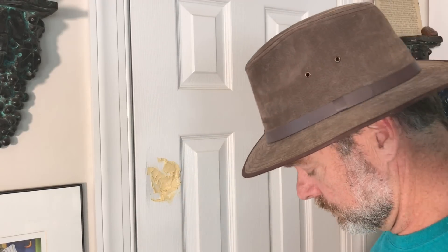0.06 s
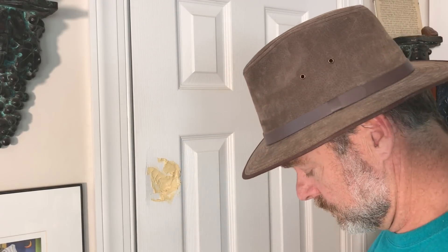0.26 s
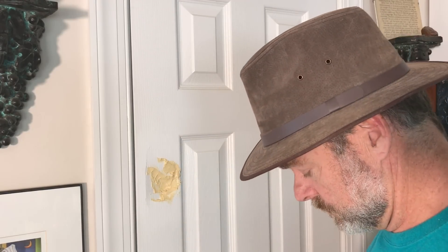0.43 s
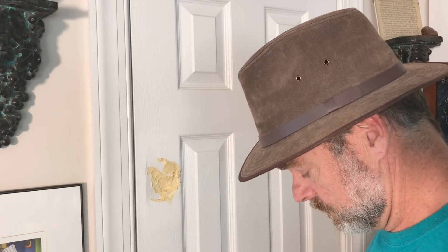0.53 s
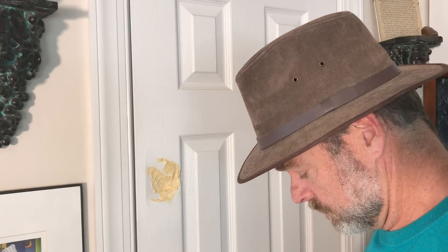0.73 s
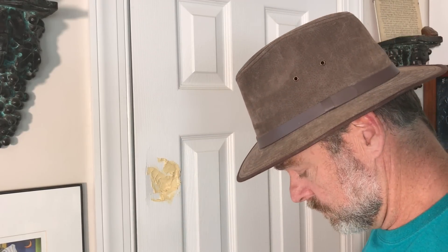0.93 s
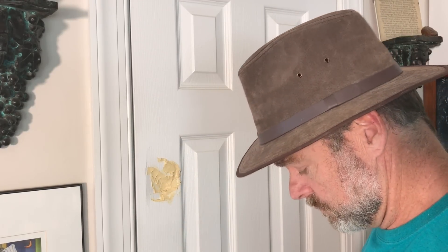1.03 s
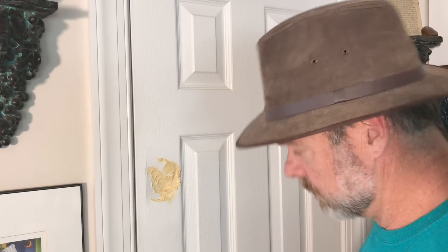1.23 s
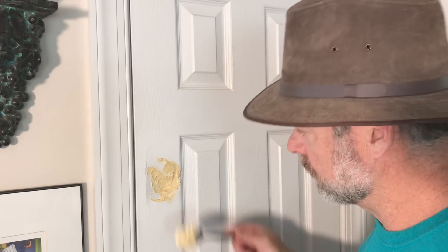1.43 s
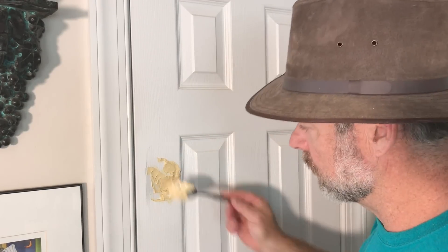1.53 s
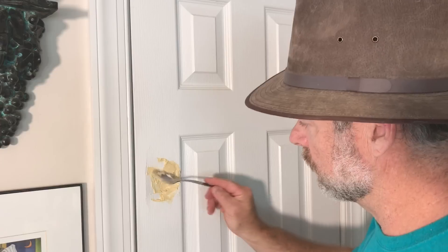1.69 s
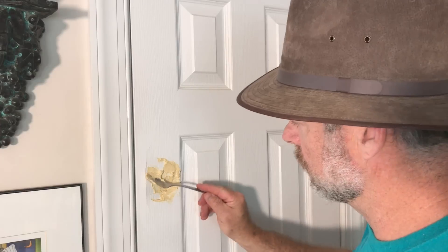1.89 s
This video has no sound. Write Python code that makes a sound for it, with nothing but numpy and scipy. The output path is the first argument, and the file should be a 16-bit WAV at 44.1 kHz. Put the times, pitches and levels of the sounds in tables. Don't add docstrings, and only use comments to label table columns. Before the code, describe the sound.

A metal spoon hits a small hand-held tin close to the microphone. Quiet motor hum and room rumble run throughout. After a barely audible brush at 0.22 seconds, a loud, bright clack lands at 0.25, with rapid bounces, a short thud and hallway reverberation. Light ticks follow from 0.38 to 0.6. A faint gritty scrape sings metallically around 0.75-1.0, then tiny touches near 1.27.

```python
import sys
import numpy as np
from scipy import signal
from scipy.fft import rfft, irfft, next_fast_len
from scipy.io import wavfile
from scipy.ndimage import map_coordinates

SR = 44100
rng = np.random.default_rng(int(sys.argv[2]) if len(sys.argv) > 2 else 0)


def linear_from_db(decibels):
    return 10 ** (np.asarray(decibels, float) / 20)


def persist_wave(psi):
    counts = np.round(np.clip(psi, -1, 1) * 32767).astype(np.int16)
    wavfile.write(sys.argv[1], SR, np.atleast_2d(counts).T)


N = 85995

# multiple of the motor rate, level/dB
HUM_LINES = [(1, -64), (4, -64), (5, -79.5), (13, -84), (19, -85.5), (20, -79), (21, -88.5)]
# f/Hz, density/dB per Hz
RUMBLE_SPECTRUM = [(12, -44.5), (20, -13), (59, -6), (107, -2.5), (191, 0.5), (237, -1.5), (334, -8.5),
                   (420, -22.5), (550, -20), (920, -120)]
# f/Hz, density/dB per Hz
AIR_SPECTRUM = [(190, -6), (330, -9), (408, -3), (768, -5.5), (874, -9.5), (1210, -7.5), (1730, -15.5),
                (15000, -26), (16000, -14.5)]
# t/s, level/dB, centre f/Hz, width
# over centre, length/s
SPOON_CONTACTS = [(0.221, -61, 4897, 0.3, 0.0059), (.222, -63, 2200, 0.39, .004), (0.381, -33, 1080, 0.63, 0.017),
                  (0.3785, -37.5, 10870, 2, 0.0065), (0.458, -49, 12500, 0.68, 0.014),
                  (0.462, -47.5, 9100, 0.27, 0.0086), (0.492, -51, 9530, 0.64, 0.013),
                  (0.541, -57, 4100, 0.196, 0.0062), (0.566, -51, 13150, .3, .004), (.566, -57, 10600, .15, .006),
                  (0.557, -60.5, 2980, 0.037, 0.03), (.588, -54, 9300, 0.12, 0.0036),
                  (0.594, -49, 2220, 0.34, 0.003), (0.5957, -51.5, 4170, 0.2, 0.0052),
                  (0.57, -54.5, 1560, 0.1, 0.01375), (0.813, -54, 12500, 1.1, .002),
                  (0.9, -53.5, 1036, 0.23, 0.0075), (0.996, -53, 13950, 0.49, 0.0021),
                  (1.004, -51, 12500, 1.4, 0.0076), (1.268, -50.5, 1560, 0.48, 0.0075),
                  (1.267, -57, 3000, 0.87, 0.0052), (1.27, -55, 970, 0.53, 0.005), (1.268, -70, 4000, 0.13, 0.005),
                  (1.278, -52, 685, 0.78, 0.0074), (1.279, -55, 1100, 1.1, 0.083), (1.33, -66, 694, 1.1, 0.097),
                  (.2448, -13, 4600, .3, .001),
    (.2459, -18, 5050, .1, .002),
    (.3785, -34, 3450, .2, .003),
    (.3787, -37, 4700, .1, .003),
    (.4752, -41, 8800, .2, .007),
    (.4752, -42, 14800, .3, .005),
    (.4752, -55, 6800, .5, .003),
    (.4835, -48, 8900, .2, .004),
    (.2477, -22, 4900, .25, .002),
    (.5955, -47, 13000, .6, .003),
]
# f/Hz, t60/s
HALL_T60 = [(150, .2), (400, 0.89), (1000, 0.76), (3000, 0.63), (4100, 0.36), (6000, 0.66), (10000, 0.48),
            (16000, 0.48)]
# t/s, level/dB, length/s,
# dullness f/Hz
KNOCK_PULSES = [
    (0.2417, -52, 0.00024, 9000),
    (0.2445, -21.5, 0.00045, 14300),
    (0.2456, -13.5, 0.00044, 13900),
    (0.2475, -16.5, 0.00026, 12200),
    (0.2543, -22.5, 0.0013, 3000),
    (0.2603, -36.5, 0.00028, 1970),
    (0.2631, -27, .0004, 6900),
    (.2855, -36.5, .002, 4000),
    (.3015, -37.5, 0.0037, 5000),
]
# f/Hz, width/Hz, level/dB
TIN_MODES = [(660, 140, -1.5), (1115.4, 82, 6.5), (1314, 69, 5), (2123, 64, 6.5), (3030, 140, 0.5),
             (4400, 400, -7.5), (5120, 50, 1.5), (6150, 110, -3.5), (5860, 90, -1), (7370, 91, -6),
             (8300, 370, -8), (9440, 500, -8), (12300, 700, -17), (14300, 250, -25)]
# f/Hz, level/dB
TIN_BODY = [(50, -40.5), (110, -16), (300, -7.5), (900, -1.5), (2600, -5.5), (3800, -29), (6700, -31.5),
            (16000, -35.5)]
# f/Hz, t60/s
RATTLE_T60 = [(200, 0.076), (1500, 0.11), (4000, 0.055), (8000, 0.057), (15000, 0.036)]
# f/Hz, level/dB
KNOCK_RETURN = [(100, -5), (400, -2), (2000, -1.5), (5000, -3.5), (15000, -9)]
# f/Hz, level/dB, t60/s
STEEL_MODES = [(1107, -39.5, 0.38), (1172, -26.5, 0.065), (1345, -28.5, 0.074), (2325, -29, 0.064),
               (1279, -31, 0.1), (877, -39.5, .15), (687, -42.5, .6), (2087, -36, 0.24), (2145, -40.5, .6),
               (3047, -40.5, 0.33), (5140, -41, 0.45), (6100, -42, 0.43), (9900, -45, 0.13),
               (14300, -46.5, .08)]
# f/Hz, width/Hz, level/dB
FLOOR_MODES = [(106, 42, -11), (255, 74, -8.5), (308.6, 78, -5.5), (442.3, 78, -5.5), (770, 120, 1.5)]
# t/s, level/dB
SCRAPE_PRESSURE = [(.37, -90), (.39, -68), (.445, -62), (0.469, -58.5), (.52, -63), (0.571, -56), (.6, -63),
                   (.66, -73), (.68, -67.5), (.74, -79), (.76, -68.5), (.8, -67), (0.836, -68),
                   (.85, -66.5), (.885, -62.5), (.91, -65), (.93, -63.5), (.955, -60.5), (0.977, -66),
                   (1.0, -71), (1.07, -72.5)]
# f/Hz, width/Hz, level/dB
SCRAPED_MODES = [(3115, 64, 1.5), (4100, 96, 1), (5170, 95, 1), (6400, 120, -8), (8670, 300, -4.5),
                 (9900, 130, 1.5), (11300, 250, -25), (14400, 700, -16)]
# f/Hz, density/dB per Hz
RASP_SPECTRUM = [(300, -38), (1000, 0.5), (2500, -4), (6000, -3), (10000, -6.5), (16000, -11.5)]
# t/s, level/dB, f/Hz
EDGE_CATCHES = [(0.753, -64, 4100), (0.782, -59, 4100), (0.81, -59.5, 4130), (0.826, -59.5, 4040),
                (.828, -63, 5150), (0.879, -62, 5130), (0.88, -63.5, 3100), (.922, -58.5, 5170),
                (0.926, -60, 4100), (0.93, -61, 3120), (0.942, -74, 4000), (.964, -53, 3990),
                (.998, -73, 3120), (.96, -60, 9900), (1.008, -68, 4100)]

MOTOR_HZ, HUM_WOBBLE_DB, HUM_DRIFT_RAD = 59.65, 1.3, 0.35
RUMBLE_DB, AIR_DB = -62, -66
TICK_HALL_DB, SCRAPE_HALL_DB, HALL_DELAY_S = -12, -10, 0.011
BLOW_S = 0.2447
KNOCK_DB, RATTLE_DB, RETURN_DB, THUD_DB = 14.5, -6, -6, 11.5
GRIT_PER_S, GRIT_SPREAD_DB = 1800, 3
RASP_DB, SING_DB = -1.5, 7
SING_FROM_S, SING_TO_S = 0.748, 0.97
CATCH_S, CATCH_WIDTH_HZ = 0.016, 110
TOP_HZ, OVER_TOP_DB = 15720, -36


def unit(x):
    return x / np.sqrt(np.mean(x ** 2) + 1e-20)


def along(points, hz):
    f, v = np.transpose(points)
    return np.interp(np.log(hz + 1), np.log(f + 1), v)


def wobble(rate):
    knots = rng.standard_normal(int(N * rate / SR) + 4)
    return map_coordinates(knots, [np.arange(N) * rate / SR])


def filtered(x, response):
    m = next_fast_len(len(x) + 8192)
    return irfft(rfft(x, m) * response(np.fft.rfftfreq(m, 1 / SR)), m)[:len(x)]


def causal(gain):
    def response(hz):
        cepstrum = irfft(np.log(gain(hz) + 1e-6))
        half = len(cepstrum) // 2
        cepstrum[1:half] *= 2
        cepstrum[half + 1:] = 0
        return np.exp(rfft(cepstrum))
    return response


def resonant(peaks):
    def response(f):
        total = 0
        for k, (centre, width, db) in enumerate(peaks):
            band = 1j * f * width / (centre * centre - f * f + 1j * f * width)
            total = total + (-1) ** k * linear_from_db(db) * band
        return total
    return response


def pitched(centre, width):
    return lambda f: resonant([(centre, width, 0)])(f) ** 2


def bursts(rows):
    out, t = np.zeros(N + 4096), np.arange(2048) / SR
    for s, db, length, response in rows:
        dying = rng.standard_normal(len(t)) * np.exp(-2 * t / length)
        puff = filtered(dying, response)
        out[round(s * SR):][:len(t)] += linear_from_db(db) * puff / np.abs(puff).max()
    return out[:N]


def impulse():
    return 1.0 * (np.arange(N) == round(BLOW_S * SR))


def background():
    def noise(points):
        return unit(filtered(rng.standard_normal(N), lambda hz: linear_from_db(along(points, hz))))

    t = np.arange(N) / SR
    hum = 0
    for multiple, db in HUM_LINES:
        level = np.sqrt(2) * linear_from_db(db + HUM_WOBBLE_DB * wobble(4.8))
        phase = 2 * np.pi * multiple * MOTOR_HZ * t + HUM_DRIFT_RAD * wobble(24)
        hum = hum + level * np.sin(phase)
    rumble = linear_from_db(RUMBLE_DB + 1.4 * wobble(4.8)) * noise(RUMBLE_SPECTRUM)
    air = linear_from_db(AIR_DB + 0.44 * wobble(1)) * noise(AIR_SPECTRUM)
    return hum + rumble + air


def ticks():
    contacts = SPOON_CONTACTS
    return bursts([(s, db, length, pitched(hz, hz * width)) for s, db, hz, width, length in contacts])


def tail(t60s):
    hz, t, z = signal.stft(rng.standard_normal(SR), SR, nperseg=128)
    decay = linear_from_db(-60 * t / along(t60s, hz)[:, None])
    out = signal.istft(z * decay, SR, nperseg=128)[1]
    return out / np.linalg.norm(out)


def hall(x):
    late = np.pad(x, (round(HALL_DELAY_S * SR), 0))
    return signal.fftconvolve(late, tail(HALL_T60))[:N]


def knock():
    def tin_gain(f):
        ringing = sum(abs(resonant([peak])(f)) ** 2 for peak in TIN_MODES)
        return np.sqrt(linear_from_db(along(TIN_BODY, f)) ** 2 + ringing)

    def dulled(hz):
        return lambda f: 1 / (1 + 1j * f / hz) ** 2

    force = bursts([(s, db, length, dulled(hz)) for s, db, length, hz in KNOCK_PULSES])
    blow = impulse()
    rattle = linear_from_db(RATTLE_DB) * signal.fftconvolve(blow, tail(RATTLE_T60))[:N]
    returned = filtered(blow, causal(lambda f: linear_from_db(along(KNOCK_RETURN, f))))
    answer = linear_from_db(RETURN_DB) * hall(returned)
    return linear_from_db(KNOCK_DB) * filtered(force + rattle + answer, causal(tin_gain))


def ring():
    t = np.maximum(np.arange(N) / SR - BLOW_S, 0)
    modes = 0
    for hz, db, t60 in STEEL_MODES:
        level = linear_from_db(db - 60 * t / t60 + 2.6 * wobble(40))
        modes = modes + level * np.sin(2 * np.pi * hz * t + 0.4 * wobble(50))
    onset = 1 - np.exp(-t / 0.0012)
    thud = linear_from_db(THUD_DB) * filtered(impulse(), resonant(FLOOR_MODES))
    return modes * onset + thud


def scrape():
    t = np.arange(N) / SR
    grains = rng.random(N) < GRIT_PER_S / SR
    grain_size = linear_from_db(GRIT_SPREAD_DB * rng.standard_normal(N)) * rng.standard_normal(N)
    grit = unit(grains * grain_size)

    s, db = np.transpose(SCRAPE_PRESSURE)
    pressure = linear_from_db(np.interp(t, s, db, -150, -150) + 1.3 * wobble(59.65))
    rough = rng.standard_normal(N) + 0.8 * grit
    rasp = unit(filtered(rough, lambda f: linear_from_db(along(RASP_SPECTRUM, f))))

    on_metal = (t > SING_FROM_S) * (t < SING_TO_S)
    drag = pressure * on_metal * (grit + 0.45 * rng.standard_normal(N))
    sing = sum(filtered(drag * linear_from_db(3.5 * wobble(29.7)), resonant([peak])) for peak in SCRAPED_MODES)
    catches = bursts([(s, db, CATCH_S, pitched(hz, CATCH_WIDTH_HZ)) for s, db, hz in EDGE_CATCHES])
    return pressure * linear_from_db(RASP_DB) * rasp + linear_from_db(SING_DB) * sing + catches


def scene():
    touches, drag = ticks(), scrape()
    answer = hall(linear_from_db(TICK_HALL_DB) * touches + linear_from_db(SCRAPE_HALL_DB) * drag)
    return (background() + touches + knock() + ring() + drag + answer)[None]


def top_cut(x):
    return signal.sosfilt(signal.butter(12, 16540, fs=SR, output="sos"), x)


def record(dry):
    def band_limit(hz):
        return np.maximum(1 / (1 + (hz / TOP_HZ) ** 120), linear_from_db(OVER_TOP_DB))

    mix = filtered(dry[0], band_limit)[None]
    return top_cut(mix)


dry = scene()
out = record(dry)
persist_wave(out)
```